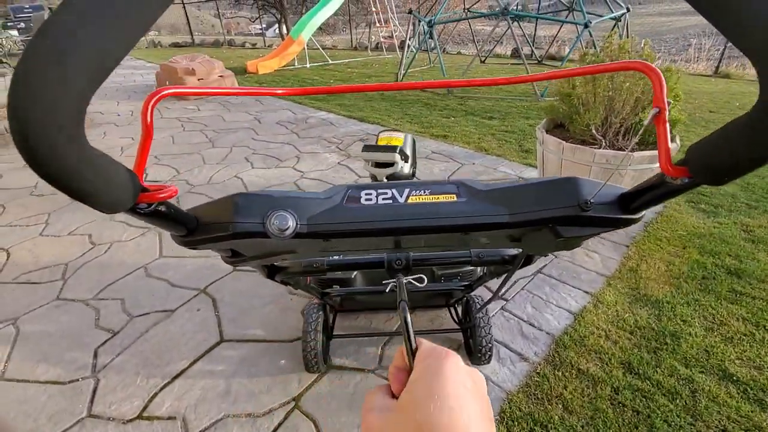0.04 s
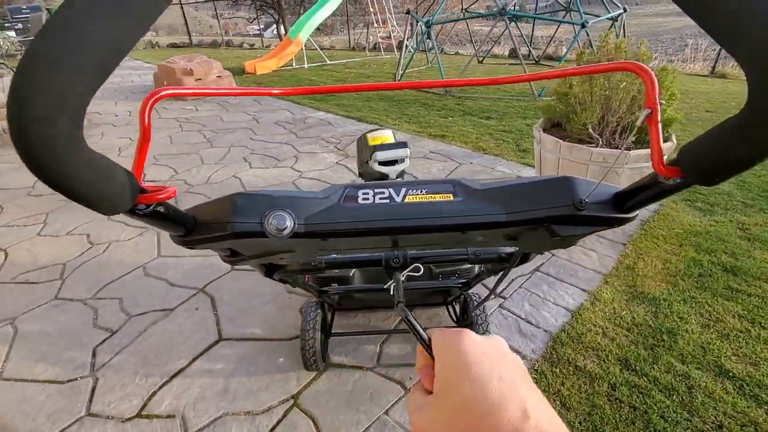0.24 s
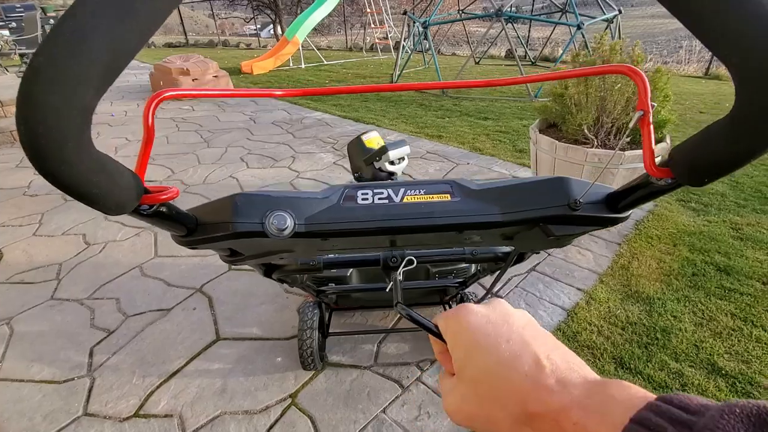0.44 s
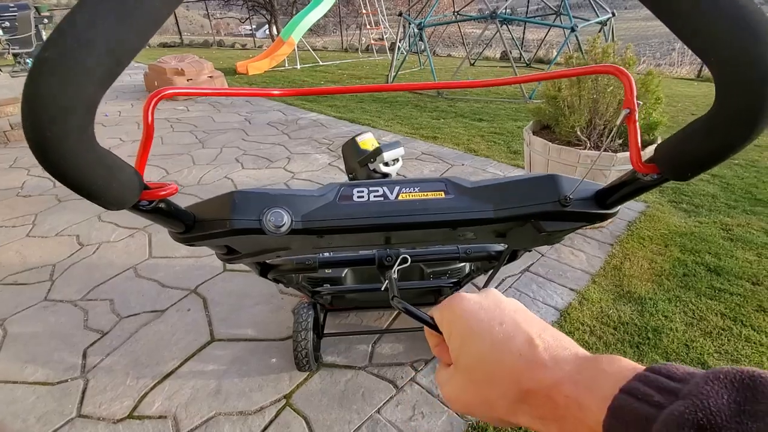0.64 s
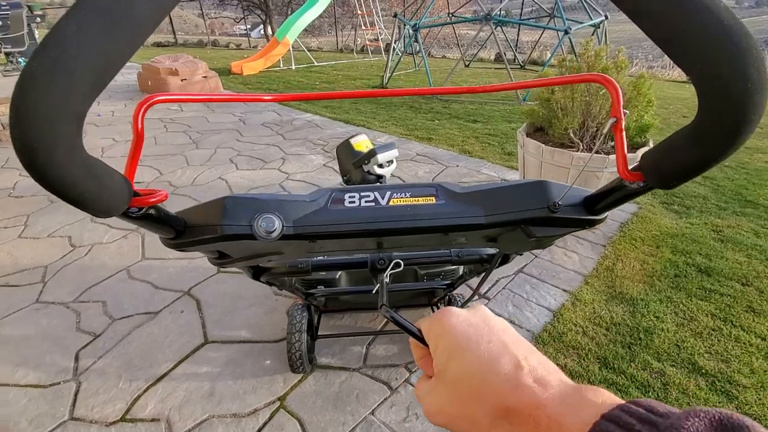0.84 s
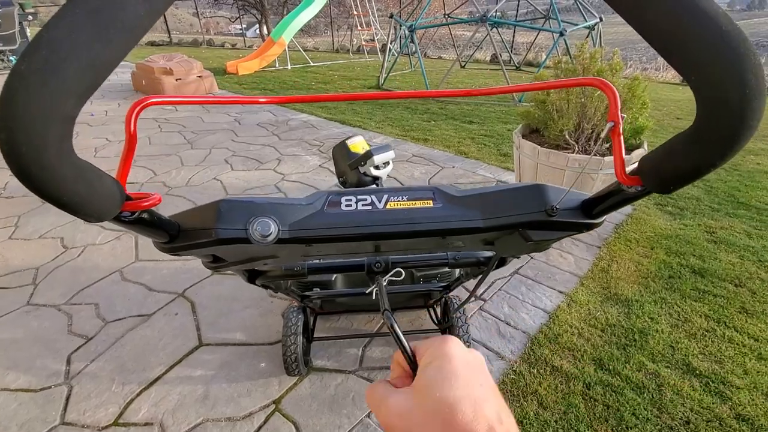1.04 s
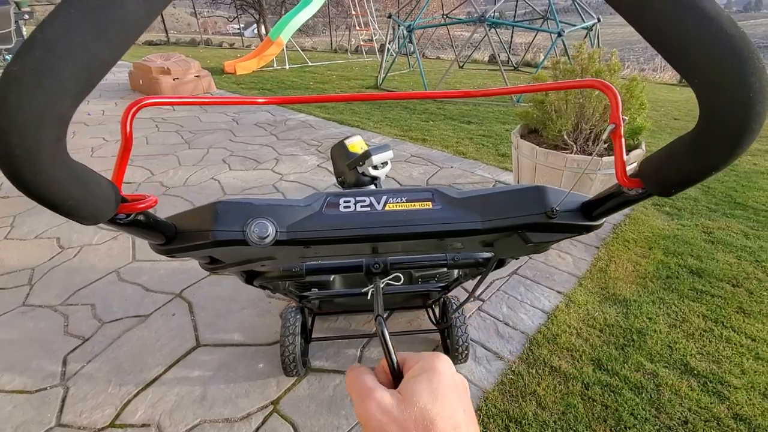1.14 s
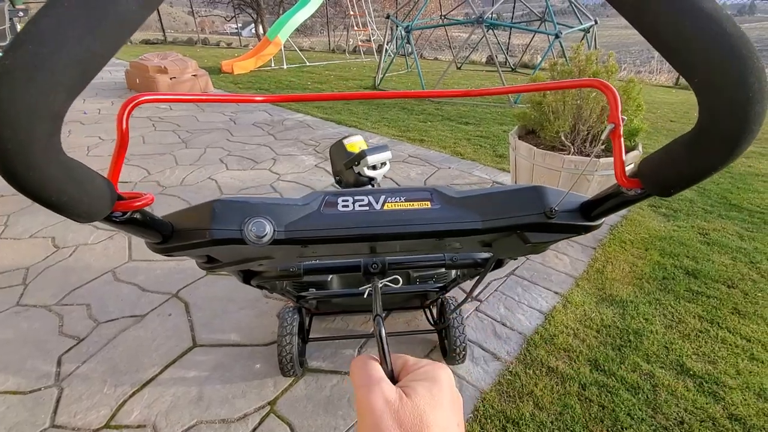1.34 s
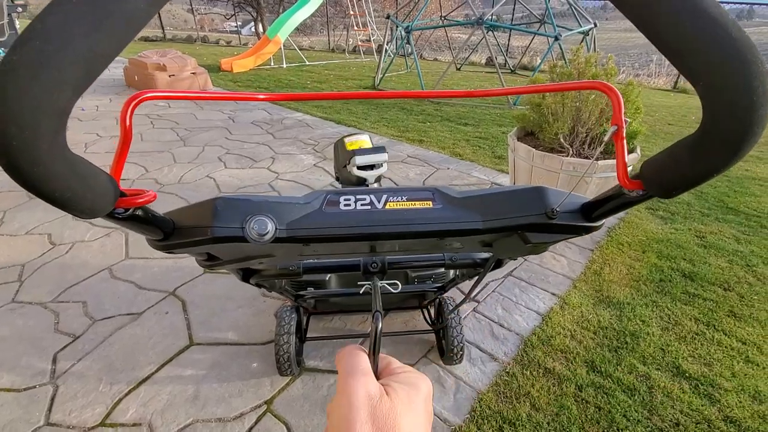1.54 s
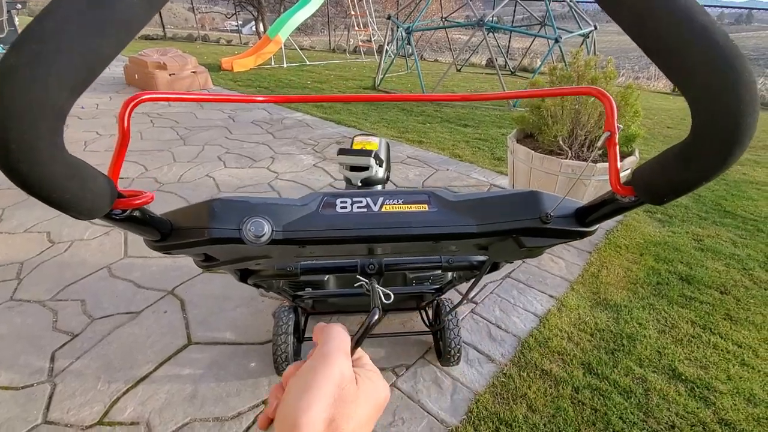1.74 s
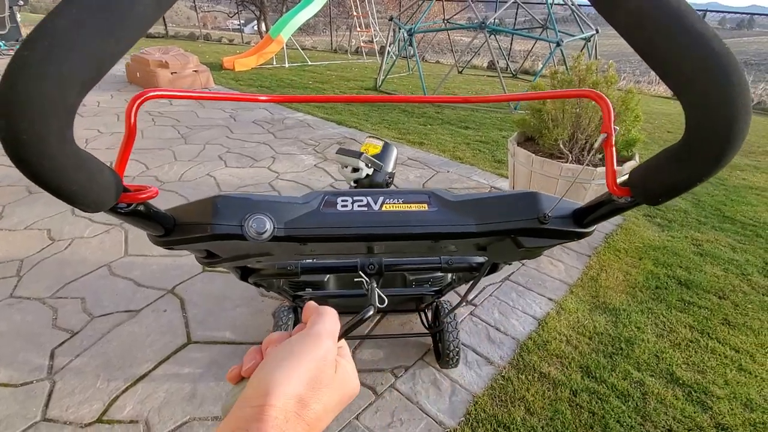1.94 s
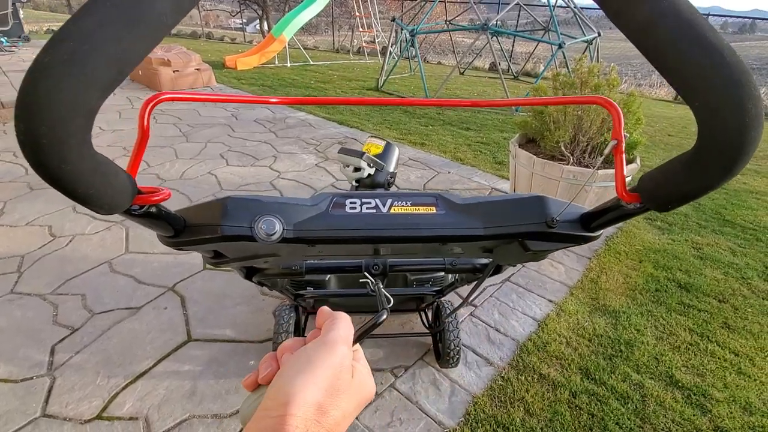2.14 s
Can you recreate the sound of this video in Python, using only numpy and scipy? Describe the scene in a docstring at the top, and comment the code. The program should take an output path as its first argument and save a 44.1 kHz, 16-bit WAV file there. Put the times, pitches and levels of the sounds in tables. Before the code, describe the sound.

Hand crank turning on a parked snowblower, rod rubbing and knocking with hollow rattling clunks outdoors

```python
"""On a patio, close by, a hand crank swings the chute of a parked snowblower round.
The crank rod rubs in its guides in short swelling scrapes, made of dense random slips and a contact hiss.
It knocks about in its play: impulses excite a rattle, a clank and a hollow boom. Rubs and knocks are
coloured by the frame's resonances. Loose parts tick; the machine rings on after each sound.
Filtered noise makes a low outdoor rumble and, at the end, a faint far whistle."""
import sys
import numpy as np
from scipy import signal
from scipy.fft import rfft, irfft
from scipy.io import wavfile
from scipy.ndimage import uniform_filter1d

SR = 44100
rng = np.random.default_rng(int(sys.argv[2]) if len(sys.argv) > 2 else 0)


def wrap_up_sound(samples):
    """Save the sound to the file named by the first command line argument, as 16-bit audio."""
    columns = np.atleast_2d(samples).T
    # keep every value between -1 and 1, then stretch to whole-number steps
    tamed = np.clip(columns, -1, 1)
    steps = np.round(tamed * 32767).astype(np.int16)
    wavfile.write(sys.argv[1], SR, steps)


N = 97020
T = np.arange(N) / SR  # time, s
HZ = np.fft.rfftfreq(8192, 1 / SR)  # frequency grid of the colouring filters


def amp(db):
    """Level law: decibels to amplitude gain."""
    return 10 ** (np.asarray(db) / 20)


def unit(x):
    """Power normalisation: scales a signal to rms 1."""
    return x / np.sqrt(np.mean(x ** 2) + 1e-20)


def decay(t, t60):
    """Exponential damping: amplitude falls by 60 dB in t60 seconds."""
    return np.exp(-np.log(1000) * t / t60)


def read(points, hz):
    """Interpolates a spectrum linearly on a log-frequency axis."""
    f, value = np.transpose(points)
    return np.interp(np.log(hz + 1), np.log(f + 1), value)


def add(mix, start_s, sound):
    """Superposition: sums a sound into the stereo mix from its start time."""
    part = mix[:, max(round(start_s * SR), 0):][:, :sound.shape[1]]
    part += sound[:, :part.shape[1]]


def colour(x, gain):
    """Minimum-phase filtering: a causal response with the given gain at the frequencies HZ."""
    size = 2 * (len(gain) - 1)
    cepstrum = irfft(np.log(np.maximum(gain, 1e-5)))
    # folding the cepstrum onto positive times makes the response causal
    cepstrum[1:size // 2] *= 2
    cepstrum[size // 2 + 1:] = 0
    response = irfft(np.exp(rfft(cepstrum)))[None, :size // 2]
    return signal.fftconvolve(x, response, axes=1)[:, :x.shape[1]]


def pair(x):
    """Spatial coherence: mixes two unrelated signals to be most alike in the bass, as at close microphones."""
    # left-right likeness: hz, correlation
    likeness = [(100, 0.98), (500, 0.92), (1100, 0.64), (2000, 0.37), (4000, 0.5), (10000, .3)]
    size = x.shape[1]
    same = np.clip(read(likeness, np.fft.rfftfreq(size, 1 / SR)), -1, 1)
    a, b = rfft(x)
    mid = a * np.sqrt((1 + same) / 2)
    side = b * np.sqrt((1 - same) / 2)
    return irfft(np.array([mid + side, mid - side]), size)


def tail(t60s, size=16384):
    """Dense modal decay: noise whose bands die at their own speeds, with unit energy and an even spectrum."""
    hz, t = np.fft.rfftfreq(size, 1 / SR), np.arange(size) / SR
    spectrum = rfft(pair(rng.choice([-1., 1.], (2, size))))
    centres_hz = np.array(t60s)[:, 0]
    out = 0
    for share, (_, t60) in zip(np.eye(len(t60s)), t60s):
        band = irfft(spectrum * read(np.c_[centres_hz, share], hz), size)
        fade = decay(t, t60)
        out = out + band * fade / np.linalg.norm(fade)
    power = (abs(rfft(out, 2 * len(HZ) - 2)) ** 2).mean(0)
    smooth_power = uniform_filter1d(power, size=25)
    return colour(out, (smooth_power + 1e-9) ** -.5)


def rumble():
    """Broadband ambience: steady shaped noise, mostly low, with a trace of hiss."""
    # spectrum of the open air: hz, gain_db
    air = [(20, -28), (38, -13.5), (60, 1.5), (95, 3.5), (130, -6), (220, -9.5), (330, -22.5), (600, -30),
           (1050, -43.5), (3000, -48), (5200, -57.5), (6700, -41.5), (8000, -55.5), (15500, -49)]
    noise = pair(rng.standard_normal((2, N)))
    return amp(-47) * unit(colour(noise, amp(read(air, HZ))))


def slips():
    """Stick-slip friction: dense tiny jolts of random sign and uneven size."""
    slips_per_s, spread_db = 1700, 1.77
    size = amp(spread_db * np.minimum(rng.exponential(1, (2, N)), 3))
    sign = rng.choice([-1., 1.], (2, N))
    happens = rng.random((2, N)) < slips_per_s / SR
    return unit(size * sign * happens)


def scrapes():
    """Sliding friction: unevenly catching swells of a rub that shakes the frame and a hiss from the contact."""
    # scrapes of the rod, rise and fall each spanning 20 dB, levels relative:
    # loudest_s, rise_s, fall_s, rub_db, hiss_db
    strokes = [(0.004, 0.082, 0.08, -23.5, -18.5), (0.066, 0.022, 0.11, -29, -16),
               (0.117, 0.012, 0.058, -37.5, -22), (0.188, 0.01, 0.063, -10.5, -3),
               (0.21, 0.021, 0.05, 2.5, 6), (0.24, 0.0044, 0.035, 4.5, 5), (0.335, 0.05, 0.036, -43, -22),
               (0.409, 0.0056, 0.11, -16, -10.5), (0.453, 0.038, 0.034, 1, 1),
               (0.492, 0.0026, 0.0091, -14, -13), (0.971, 0.027, 0.13, -37, -46.5),
               (1.144, 0.034, 0.035, -17.5, -9.5), (1.215, 0.0024, 0.0093, -17.5, -4),
               (1.249, 0.043, 0.045, -18, -10), (1.538, 0.0094, 0.035, -15.5, -4),
               (1.56, 0.018, 0.04, -8, -3), (1.603, 0.0078, 0.036, -9, -10),
               (1.635, 0.021, 0.036, -5.5, 1.5), (1.657, 0.0096, 0.044, 2, 2),
               (1.712, .02, 0.018, -15.5, -22), (1.759, 0.032, 0.031, -3.5, 1),
               (1.799, 0.0035, 0.055, -7.5, -4.5), (1.844, 0.032, 0.044, -4, 5.5),
               (1.861, 0.024, 0.029, 2.5, 4)]
    # spectrum of the contact hiss: hz, gain_db
    hiss_spectrum = [(500, -14.5), (2500, 7.5), (4500, 2), (6500, 1.5), (8500, -1.5), (12000, -0.5),
                     (14500, 3), (16000, -6.5)]
    rub_gain_db, hiss_gain_db, left_db = -9.5, -37.5, 2.5
    catches_per_s, catch_db = 410, 1.5
    rub_corner_hz = 232  # a rub shakes the frame little below this
    rub_power, hiss_power = 0, 0
    for loudest_s, rise_s, fall_s, rub_db, hiss_db in strokes:
        distance = np.maximum((loudest_s - T) / rise_s, (T - loudest_s) / fall_s)
        swell = np.exp(-np.log(100) * np.minimum(distance, 10))
        rub_power = rub_power + swell * amp(rub_db) ** 2
        hiss_power = hiss_power + swell * amp(hiss_db) ** 2
    catching = np.interp(T * catches_per_s, np.arange(N), rng.standard_normal(N))
    grip = unit(amp(catch_db * catching))
    fizz = unit(colour(slips(), amp(read(hiss_spectrum, HZ)))) * amp([[left_db], [-left_db]])
    rub = colour(np.sqrt(rub_power) * grip * pair(slips()), HZ / np.hypot(HZ, rub_corner_hz))
    hiss = np.sqrt(hiss_power) * grip * fizz
    return amp(rub_gain_db) * rub, amp(hiss_gain_db) * hiss


def boom(t):
    """Modal ringing: the hollow plastic console sounds two damped low modes at random phases."""
    # modes of the console: pitch_hz, level_db (relative), t60_s
    modes = [(229.3, -1, 0.18), (261.1, -0.5, .19)]
    out = 0
    for hz, db, t60 in modes:
        out = out + amp(db) * decay(t, t60) * np.sin(2 * np.pi * (hz * t + rng.random()))
    return out * np.minimum(t / 0.014, 1)  # rise, s


def knocks():
    """Impact excitation: each contact is a click, a struck part's clank, a short rattle and a hollow boom."""
    # knocks of the rod and gear, levels relative: start_s, strength_db, corner_hz (brightness),
    # thud_db (bass), pitch_hz (struck part)
    contacts = [(0.001, -13.5, 1460, 7.5, 580), (0.015, -11.5, 1000, 4.5, 510),
                (0.087, -18.5, 796, 8.5, 420), (0.2011, -3.5, 3010, -18, 1216),
                (0.2098, -5.5, 3400, -8.5, 1264), (0.2158, 0.5, 2100, 0.5, 1410),
                (0.2224, -0.5, 1800, 1.5, 1318), (0.2421, 0.5, 4200, -2, 1554), (0.2469, 3, 2300, 1, 404),
                (0.378, -18.5, 1720, 4, 1305), (0.4364, -0.5, 2740, -24, 1378),
                (0.4426, 1.5, 1960, -11.5, 1497), (0.4541, 1, 3750, -7.5, 1412), (0.461, 1, 2620, -5, 1227),
                (0.512, -26.5, 1490, 11.5, 424), (0.863, -24, 970, 13, 722), (0.909, -29, 1700, 4, 1044),
                (0.959, -19.5, 840, 9, 622), (1.017, -19, 1920, 11, 613), (1.083, -24, 1200, 5, 523),
                (1.097, -21, 960, 7.5, 428), (1.137, -14, 1260, 12.5, 590), (1.193, -19.5, 1010, 9, 434),
                (1.214, -3, 2770, -14, 1395), (1.220, -6.5, 1830, -5.5, 1537), (1.262, -10.5, 965, 2, 663),
                (1.277, -15, 817, 5, 506), (1.5445, -10.5, 1100, 5, 519), (1.5548, -3, 1293, 0, 706),
                (1.6, -12, 3020, 8, 1740), (1.612, -16.5, 1300, 10, 1170), (1.64, -2, 1750, -9.5, 1160),
                (1.656, -5, 5150, 0, 650), (1.667, -4.5, 1248, 6.5, 432), (1.680, -2.5, 1310, 6, 1070),
                (1.712, -6, 1520, -2.5, 435), (1.7591, -5, 3590, 0, 420), (1.767, -3, 1170, 0, 736),
                (1.802, -1.5, 1170, -1.5, 610), (1.840, -8, 1990, 4, 409), (1.849, -6, 650, 7, 322),
                (1.857, 5.5, 3700, -15.5, 1696), (1.866, -1, 1890, -3, 1106), (2.104, -24, 658, 4.5, 596)]
    # rattling decay of the panels: hz, t60_s
    rattle = [(100, 0.74), (250, 0.25), (520, 0.16), (1500, 0.076), (4000, 0.11), (12000, .045)]
    knock_db, click_db, clank_db, boom_db = 16.5, -12.5, -34, -49.5
    click_growth = 0.26  # further dB of click and clank, over the whole blow, per dB of strength
    boom_growth = 0.72  # dB of boom per dB of strength
    thud_corner_hz, thud_share = 376, 0.81  # share of the thud dB that lifts the whole bass
    contact_order = 3.26  # steepness of the treble loss
    out, t = np.zeros((2, N)), T[:N // 8]
    for start_s, db, corner_hz, thud_db, pitch_hz in contacts:
        blow = tail(rattle, size=6144)
        clank = decay(t, 0.057) * np.cos(2 * np.pi * pitch_hz * t)
        add(blow, 0, amp(clank_db + click_growth * db) * clank[None])
        blow[:, 0] += amp(click_db + click_growth * db)
        softness = (1 + (HZ / corner_hz) ** (2 * contact_order)) ** -.5
        bass_lift = amp(thud_share * thud_db / (1 + (HZ / thud_corner_hz) ** 4))
        add(out, start_s, amp(knock_db + db) * colour(blow, softness * bass_lift))
        boom_gain = amp(knock_db + boom_db + boom_growth * db + thud_db)
        add(out, start_s, boom_gain * boom(t)[None])
    return out


def frame(force):
    """Forced resonance: frame and panels colour what shakes them, heard from a little to the left."""
    # broad response of the frame: hz, gain_db
    broad = [(40, -40), (110, -11.5), (170, 5), (300, 1), (500, -5), (680, 2), (920, -4), (1350, -3),
             (2000, -6.5), (3000, -8), (5000, -16), (8000, -25.5), (16000, -34.5)]
    # resonances of the frame: pitch_hz, width_hz, lift_db
    modes = [(179, 13, 4), (212.1, 22.6, 6), (289.7, 25, 5.5), (433.3, 39.8, 7), (515.3, 80, 7),
             (614.4, 19, 3.5), (1087, 40, 5.5), (1179, 53, 3), (1337, 25, 3), (1379, 110, 1.5),
             (1540, 24, 4.5), (1870, 30, 4.5), (2306, 25, 4.5), (2620, 77, 2.5), (3320, 75, 4.5)]
    # level lean: hz, lean_db (up on the left, down on the right)
    left_lean = [(60, -2), (250, 0.37), (600, 0.82), (1300, 2), (4000, 0.83), (15000, -0.8)]
    right_lag_s = .00004
    lift_db = sum(db / (1 + (2 * (HZ - hz) / width) ** 2) for hz, width, db in modes)
    left, right = rfft(colour(force, amp(read(broad, HZ) + lift_db)))
    hz = np.fft.rfftfreq(N, 1 / SR)
    lean = amp(read(left_lean, hz))
    lag = np.exp(-2j * np.pi * hz * right_lag_s)
    return irfft(np.array([left * lean, right / lean * lag]), N)


def linger(sound):
    """Reverberant decay: the machine's long faint ring, convolved with the sound that excites it."""
    # decay of the ring: hz, t60_s
    ring = [(100, 0.25), (250, 0.34), (480, 0.18), (1500, 0.2), (4000, 0.22), (12000, 0.16)]
    return amp(-14.5) * signal.fftconvolve(sound, tail(ring), axes=1)[:, :N]


def ticks():
    """Narrow-band transients: small loose parts touch in short thin noise bursts, each round one pitch."""
    # light ticks of the linkage: start_s, pitch_hz, level_db (before rise and decay)
    touches = [(0.644, 12970, -52.5), (0.647, 3000, -60.5), (0.861, 8000, -65), (1.074, 3470, -55),
               (1.934, 8400, -56), (2.027, 8170, -66)]
    rise_s, t60_s = 0.0022, 0.075
    q, skirt = 3.9, 0.62  # sharpness, and steepness of the flanks
    out, t = np.zeros((2, N)), T[:len(HZ)]
    for start_s, hz, db in touches:
        band = (1 + (2 * q * (HZ / hz - 1)) ** 2) ** -skirt
        burst = unit(colour(rng.standard_normal((2, len(t))), band))
        add(out, start_s, amp(db) * burst * np.minimum(t / rise_s, 1) * decay(t, t60_s))
    return out


def whistle():
    """Narrow-band noise: a resonance leaves a thin broken tone, far off at the end."""
    start_s, rise_s, pitch_hz, width_hz = 2.04, 0.059, 2590, 130
    band = 1 / (1 + (2 * (HZ - pitch_hz) / width_hz) ** 2)
    tone = unit(colour(rng.standard_normal((1, N)), band))
    return amp(-76) * tone * np.clip((T - start_s) / rise_s, 0, 1)


def scene():
    """Superposition of the crank, the machine's lingering ring and the open air."""
    rub, hiss = scrapes()
    crank = frame(knocks() + rub) + hiss + ticks()
    return crank + linger(crank) + rumble() + whistle()


def record(dry):
    """Band limitation: the recorder passes little above its upper edge."""
    edge_hz = 15800
    low_pass = signal.firwin(511, edge_hz, window=("kaiser", 9), fs=SR)
    return signal.oaconvolve(dry, low_pass[None], "same")


dry = scene()
out = record(dry)
wrap_up_sound(out)
```